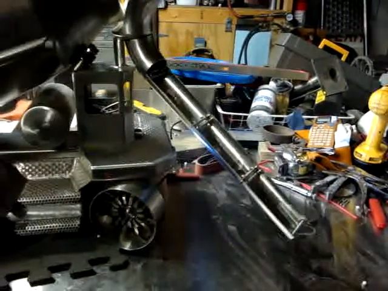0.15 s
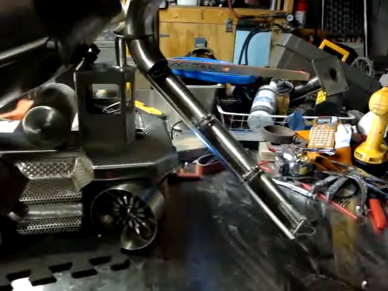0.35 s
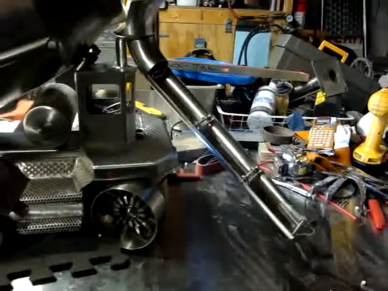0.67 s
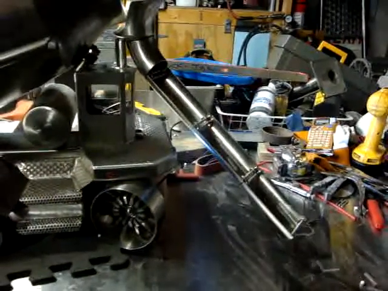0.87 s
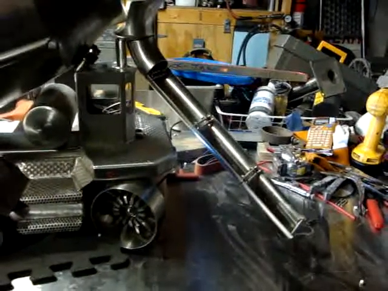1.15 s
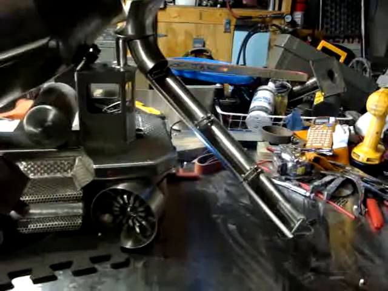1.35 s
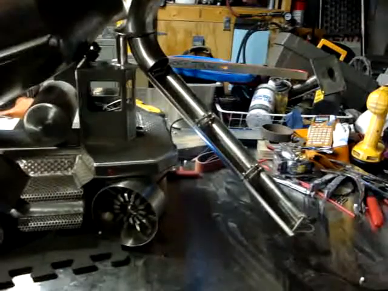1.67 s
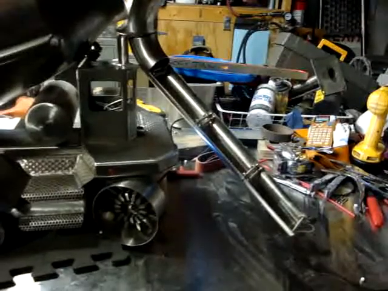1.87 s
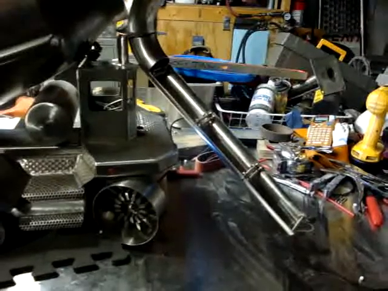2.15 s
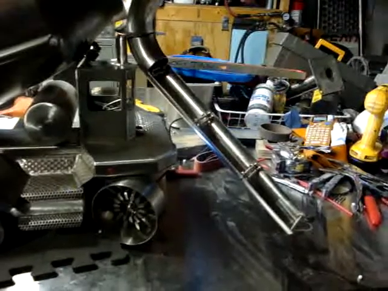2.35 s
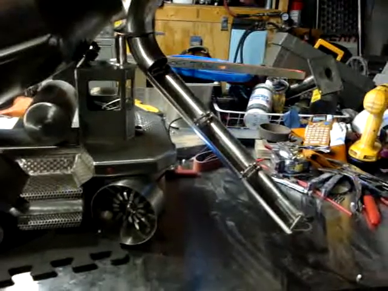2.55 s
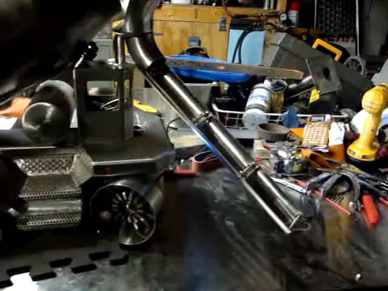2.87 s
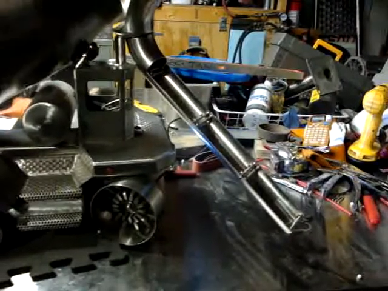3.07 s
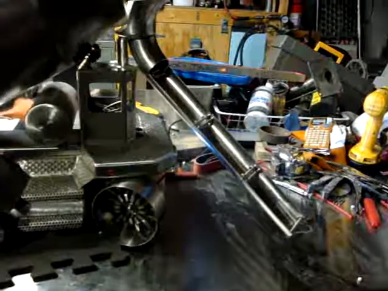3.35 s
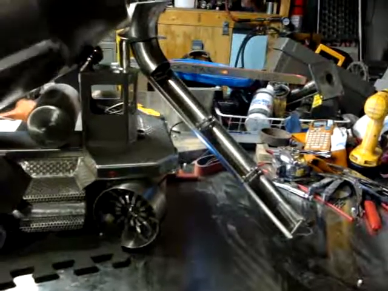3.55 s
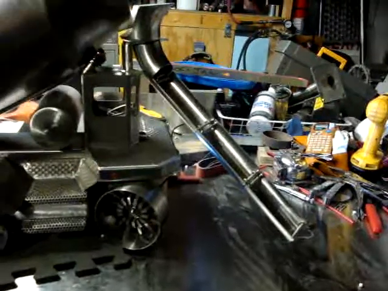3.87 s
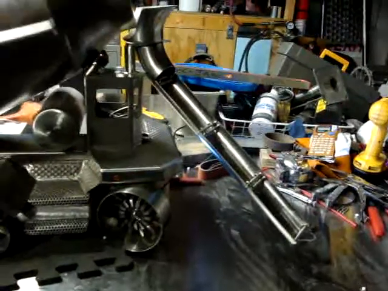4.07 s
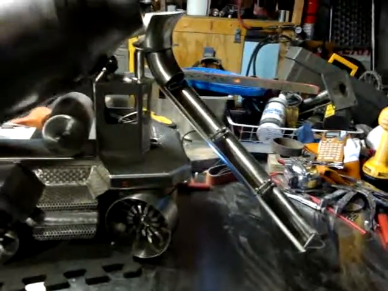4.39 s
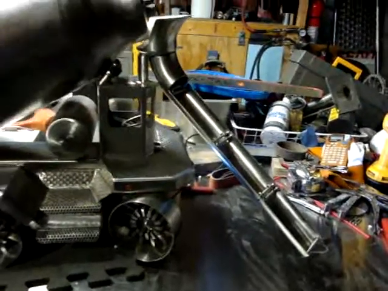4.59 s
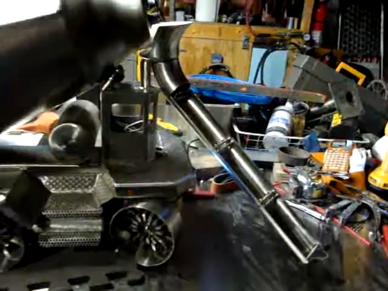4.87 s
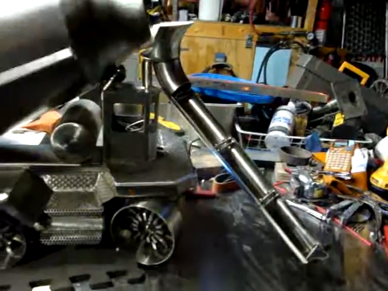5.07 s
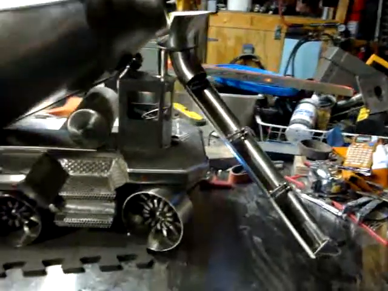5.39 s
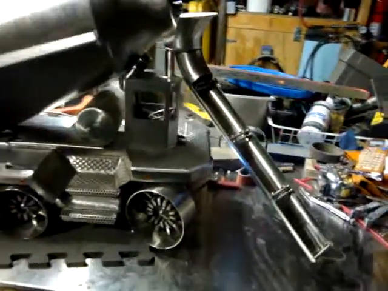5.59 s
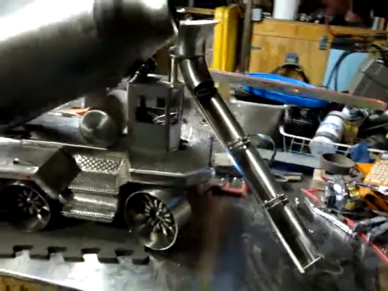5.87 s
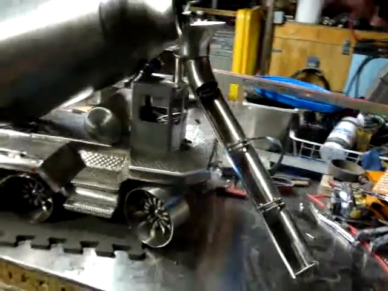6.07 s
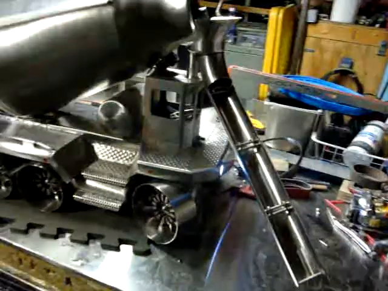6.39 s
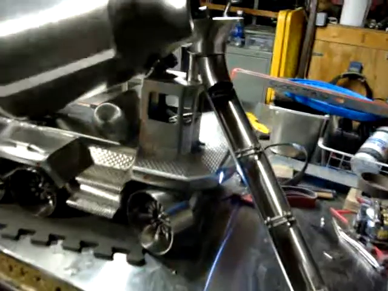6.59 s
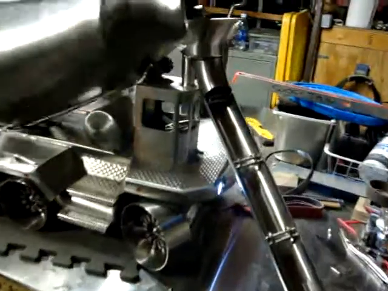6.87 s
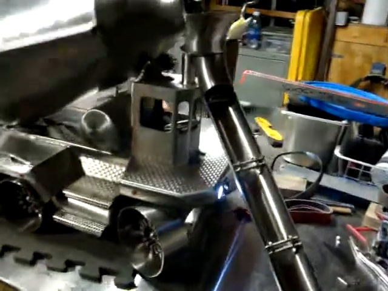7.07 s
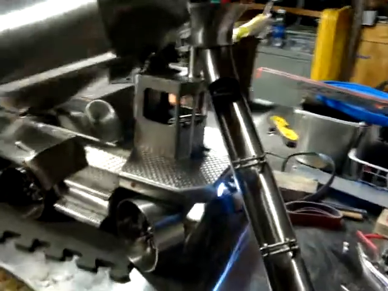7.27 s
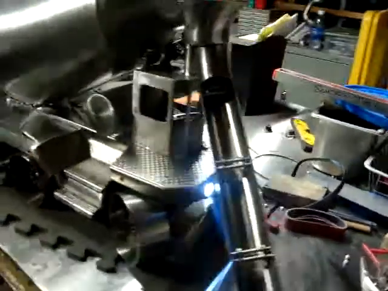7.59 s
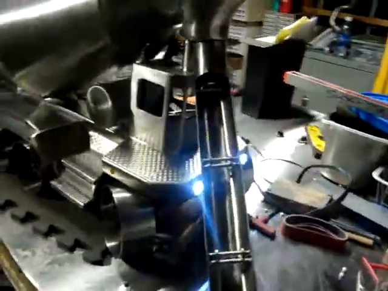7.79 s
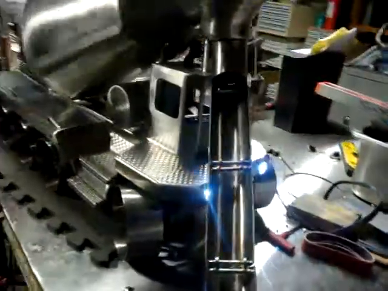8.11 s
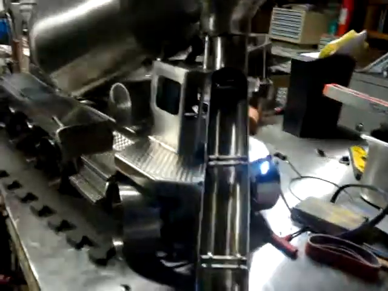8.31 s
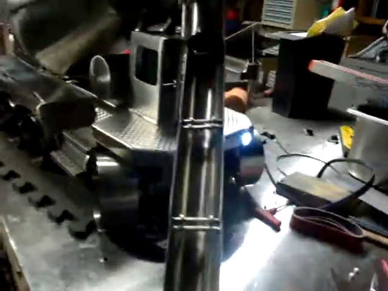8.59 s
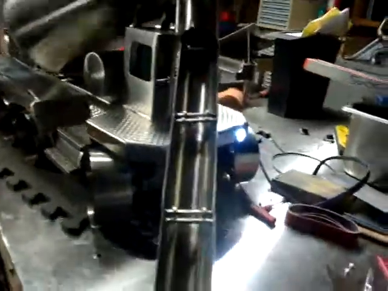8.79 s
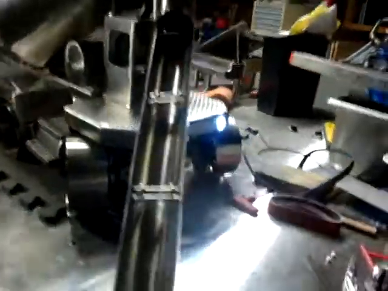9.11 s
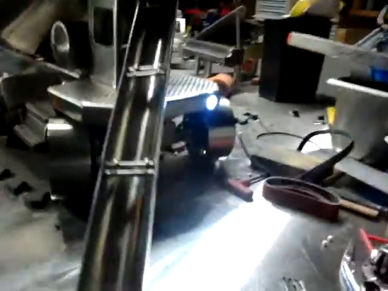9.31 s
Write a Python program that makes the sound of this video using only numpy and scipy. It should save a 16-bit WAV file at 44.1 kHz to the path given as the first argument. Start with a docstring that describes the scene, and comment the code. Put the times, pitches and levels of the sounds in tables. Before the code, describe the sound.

Light metallic rattling and short bright scrapes come first, with a few sharp clicks over faint shop air. A small electric motor then kicks in, climbing quickly to a reedy, ringing gear whine. Each drum turn drags the pitch slowly down with gritty grinding, then releases it quickly upward into hissing. Close microphone, mono, short reverberation of a cluttered shop.

```python
"""Workshop bench: a steel model mixer truck, close to a mono microphone, in faint shop air and hum.
Metal parts scrape and click: coloured noise grains and bursts, with sines for singing and ringing steel.
Then a small geared motor starts and turns the drum: gear-tone sines and noise bursts timed by the teeth.
The drum drags the motor down once a turn: the gears grind under load, and it hisses when running free."""
import sys
import numpy as np
from scipy import signal
from scipy.fft import rfft, irfft, next_fast_len
from scipy.io import wavfile
from scipy.ndimage import uniform_filter1d, map_coordinates

SR = 44100
rng = np.random.default_rng(int(sys.argv[2]) if len(sys.argv) > 2 else 0)


def digitize_waveform(pressure):
    """Quantize a signal to 16-bit integers and store it at the path in sys.argv[1].

    Rows of a 2-D input are taken as channels; values are limited to [-1, 1].
    """
    field = np.atleast_2d(pressure).T
    bounded = np.clip(field, -1, 1)
    quanta = np.round(bounded * 32767).astype(np.int16)
    wavfile.write(sys.argv[1], SR, quanta)


N = 416744
TIME = np.arange(N) / SR  # [s]
EDGE_HZ = 10150  # upper band limit

# Motor start, as tooth rate of the first gear; START_SHARE is the speed share missing at switch-on
START_S, SPIN_UP_S, START_SHARE, FREE_HZ = 2.62, 0.62, 0.522, 639.6
# Drum's heavy side lifted each turn: (time [s], time to the top [s], speed lost [Hz])
DRUM_LIFTS = [(3.165, 0.97, 125.1), (4.828, 0.83, 124.9), (6.318, 0.85, 120.9), (7.755, 0.98, 91.87),
              (9.294, 1, 118)]
# Past the top the load falls away; the curves are exponents
TIP_S, LIFT_CURVE, TIP_CURVE = 0.543, 1.245, 1.802
# Gears bind: (time [s], half length [s], speed lost [Hz], extra grinding [dB], extra hiss [dB])
GEAR_SNAGS = [(3.562, .07, 8.5, 3, 2), (3.688, 0.023, 1, 6.5, 1), (3.938, 0.1, 17.5, 0.5, 3),
              (4.271, 0.076, 7.5, 1, 3.5), (5.244, 0.051, 0, 3.5, 3.5), (5.563, .083, 25, 1, 0),
              (5.875, 0.048, 4, 0.5, 2.5), (7.117, 0.052, 26, 0.5, -3), (7.27, 0.15, 19.5, 2.5, 5.5),
              (8.316, 0.16, 29, 0, 0.5), (8.664, 0.12, 62, 7.5, -9), (8.846, 0.19, 49.5, 1, 2)]
# Base levels (running free [dB], at the top of the lift [dB])
GRIND_DB, RUMBLE_DB, CHATTER_DB = (-40.5, -35), (-50.5, -45.5), (-27.5, -27.5)
RUMBLE_FADE_DB_PER_S = 0.6  # the microphone moves round the truck
HISS_AT_FREE_DB, HISS_DB_PER_OCTAVE, HISS_TIPPING_DB = -31, 27, 1.5
SUPPLY_HZ, SUPPLY_DB = 116, -69  # low hum while the motor draws current

# Gear tones: (multiple of the tooth rate [-], relative level [dB])
GEAR_ORDERS = [(.4, -24.5), (.537, -20), (.6, -23), (1.2, -4), (1.8, -12), (2, -3.5), (2.4, -9), (3, 0),
               (3.6, -6.5), (4, -1), (4.2, -11.5), (4.8, -9), (5, -0.5), (5.4, -15.5), (6, -1.5),
               (6.6, -10.5), (7, 0), (7.2, -6), (8, -0.5), (9, 2.5), (10, 0.5), (11, -2)]
# Gear-tone level against pitch; the drum rings near 2.6 kHz: (frequency [Hz], level [dB])
WHINE_RESPONSE = [(220, -37), (280, -46), (312, -28.5), (345, -41), (560, -49.5), (660, -49), (750, -40),
                  (950, -41), (1130, -37.5), (1300, -43.5), (1900, -38), (2350, -37), (2500, -30.5),
                  (2620, -26.5), (2800, -34.5), (3050, -32), (3300, -31.5), (3700, -33.5), (4000, -36.5),
                  (4500, -39), (5100, -45.5), (6500, -51)]
# One gear tone rings out or sinks: (time [s], half length [s], multiple of tooth rate [-], extra [dB])
TONE_FLARES = [(2.82, 0.071, 1, 4), (2.832, 0.067, 6, 7), (2.824, 0.061, 7, 6.5), (2.986, 0.096, 5, 6),
               (3.27, .06, 5, -19), (3.25, 0.092, 6, -12), (3.295, 0.15, 1.2, 4), (3.423, 0.081, 4, 11.5),
               (3.43, .08, 6, 2), (3.48, 0.074, 5, 9), (4.05, 0.52, 1, 4), (4.114, .06, 5, 5),
               (4.24, 0.06, 5, -6.5), (4.378, 0.038, 7, 8), (4.486, 0.21, 5, 5.5), (4.45, 0.19, 6, 0),
               (4.63, 0.054, 4, -4), (4.8, 0.2, 1.2, 6.5), (4.95, 0.052, 4, 8.5), (4.984, 0.051, 5, 9),
               (5.206, 0.11, 6, 9), (5.42, 0.044, 6, -5), (5.48, 0.63, 7, 3.5), (5.6, 0.18, 1, 3),
               (5.607, 0.42, 8, 6.5), (5.856, 0.08, 6, 8.5), (6.01, 0.17, 5, 8.5), (6.317, 0.18, 4, 11),
               (6.578, 0.13, 5, 12), (6.683, .06, 7, 2), (6.727, 0.38, 6, 11), (6.833, .06, 8, 8),
               (7.09, 0.099, 8, 10.5), (7.12, 0.42, 7, 6.5), (7.172, 0.084, 5, 10), (7.286, 0.21, 6, 8),
               (7.58, 0.14, 5, 10), (7.755, 0.11, 7, 9), (7.971, 0.16, 1, 4.5), (8.122, 0.33, 6, 5.5),
               (8.33, 0.21, 7, 8.5), (8.477, 0.045, 6, 4), (8.604, 0.17, 5, -3), (8.696, 0.17, 8, 11),
               (8.957, 0.15, 5, 2.5), (9.3, 0.066, 6, 6), (9.297, 0.065, 7, 10.5), (9.304, 0.31, 1, 7)]
# Narrow drum modes: (frequency [Hz], width [Hz], relative level [dB])
DRUM_MODES = [(2516, 32, -3), (2596, 36, -0.5), (2655, 38, -4), (2820, 30, -7.5), (2970, 35, -12.5),
              (3260, 35, -3), (3410, 25, -5), (3550, 50, 0), (3620, 42, -2), (3970, 36, -1), (4114, 10, -4)]
# First gear's note; the chassis booms at some speeds: (tooth rate [Hz], level [dB])
CHASSIS_RESPONSE = [(430, -58), (495, -42.5), (515, -47.5), (545, -44.5), (568, -53), (595, -44.5),
                    (618, -39), (630, -43.5), (642, -49.5)]
# Steel body resonances: (frequency [Hz], width [Hz], lift [dB])
BODY_MODES = [(233, 56, 8), (303.7, 6.1, 8), (484, 19, 9.5), (787, 20, 4.5), (893, 50, 3.5),
              (1048, 22, 6.5), (1144, 15, -1.5), (1540, 160, 0.5), (1590, 70, 2), (1692, 32, 16.5),
              (1884, 72, 10), (2112, 90, 10.5), (2560, 310, 9), (2940, 200, 4), (3220, 45, 8),
              (3670, 1000, 8.5)]
# Grinding spectrum: (frequency [Hz], density [dB per Hz])
GRIND_SPECTRUM = [(30, -79), (200, -30), (400, -33), (520, -6), (650, 4.5), (800, 0), (1030, 0.5),
                  (1350, -2.5), (2000, -34), (3000, -28), (6000, -34)]
# Low gear rumble spectrum: (frequency [Hz], relative level [dB])
RUMBLE_SPECTRUM = [(30, -34.5), (55, -25), (90, -17), (120, -1.5), (165, -6), (215, 4.5), (300, 4),
                   (450, 8), (700, -1), (1500, -27)]
# Tooth chatter spectrum: (frequency [Hz], relative level [dB])
CHATTER_SPECTRUM = [(300, -40), (1300, -14.5), (1800, -7), (2350, -6.5), (2700, -4), (3700, -6.5),
                    (4400, -7), (5500, -6.5), (10000, -8.5)]
# Brush hiss spectrum: (frequency [Hz], relative level [dB])
HISS_SPECTRUM = [(1000, -21.5), (3000, -38.5), (5000, 1), (6300, -0.5), (7700, 12), (8800, 4.5),
                 (10000, -0.5)]
# Short spits of hiss: (time [s], half length [s], extra [dB])
HISS_SPITS = [(3.887, 0.0086, 12.5), (4.564, 0.037, 5.5), (5.77, .016, 8.5), (6.427, 0.061, 1),
              (7.66, 0.12, 2), (8.02, 0.12, 2.5), (8.867, .018, 10.5), (9.158, 0.052, 5.5)]

# Short strokes of steel sliding on steel: (time [s], hold [s], relative level [dB])
SLIDE_STROKES = [(0.0, 0.013, -31.5), (0.037, .01, -35), (0.049, 0.065, -29.5), (0.228, 0.13, -32.5),
                 (0.366, 0.041, -29), (0.545, 0.034, -34), (0.665, 0.037, -45.5)]
# Sliding contact spectrum: (frequency [Hz], density [dB per Hz])
SLIDE_SPECTRUM = [(100, -36), (400, -30), (750, -9), (1500, -7), (2600, 0.5), (4200, 5), (6000, 3),
                  (8000, 5.5), (10000, 9.5)]
# The sliding part sings: (time [s], hold [s], level [dB])
SLIDE_SINGS = [(0.0, 0.045, -41), (0.055, 0.022, -39), (0.2, 0.088, -40), (0.375, 0.081, -35.5),
               (0.5, 0.15, -43), (0.68, 0.078, -43), (1.11, .06, -55), (1.24, 0.063, -50)]
# Tones of the singing part: (frequency [Hz], relative level [dB])
SING_PARTIALS = [(3322, -2), (4005, -11), (4570, -16), (5825, -21), (6401, -32), (7467, -32)]
# Lower squeaks: (time [s], hold [s], level [dB], pitch [Hz])
SLIDE_SQUEAKS = [(0.09, 0.29, -47, 1740), (1.408, 0.077, -44, 2000)]
# An edge rasps over the steel after some clicks: (time [s], hold [s], level [dB])
EDGE_RASPS = [(0.972, .008, -32), (1.174, .004, -35.5), (1.405, 0.012, -29.5)]
# Rasp spectrum: (frequency [Hz], density [dB per Hz])
RASP_SPECTRUM = [(300, -55), (1000, -20), (1350, -11), (1750, -7.5), (2020, -1.5), (2400, -8), (3300, -6.5),
                 (5000, -12.5), (10000, -35)]

# Clicks of metal parts: (time [s], relative level [dB], brightness as centre frequency [Hz], chatter t60 [s],
# relative ring [dB], peak of the snap of first contact [dB])
METAL_CLICKS = [(0.051, -14.5, 8100, 0.057, -39, -24), (0.068, -15.5, 5030, 0.04, -42, -23),
                (0.091, -16, 8000, 0.03, -47, -26), (0.118, -21, 7000, .04, -45, -22),
                (0.162, -15.5, 6400, 0.046, -38, -26), (0.19, -18, 4200, 0.012, -48, -11),
                (0.193, -17, 3900, 0.02, -48, -21), (0.224, -14, 7550, 0.053, -40, -18),
                (0.267, -14, 4200, 0.12, -39, -25), (0.388, -27, 6500, 0.04, -38, -24),
                (0.413, -17, 6000, 0.04, -38, -24), (0.477, -19.5, 4200, 0.074, -25, -22),
                (0.549, -25, 7500, 0.03, -45, -18), (0.584, -23, 3320, 0.074, -37, -19),
                (0.668, -20.5, 3320, 0.052, -42, -16), (0.751, -22.5, 3660, 0.036, -46, -18),
                (0.779, -21.5, 3380, 0.071, -42, -19), (0.830, -20, 4320, 0.088, -46, -20),
                (0.883, -24, 5400, 0.21, -25, -26), (0.959, -35, 4500, 0.06, -50, -34),
                (0.973, -23.5, 2380, 0.084, -53, -16), (0.98, -23, 4500, .03, -50, -23),
                (1.014, -30, 1970, 0.09, -48, -28), (1.083, -24, 2750, 0.053, -25, -20),
                (1.164, -25, 3460, 0.06, -47, -16), (1.173, -18.5, 3840, 0.046, -36, -12),
                (1.219, -29, 3960, 0.18, -37, -18), (1.297, -24, 4140, 0.058, -47, -32),
                (1.338, -10.5, 3180, 0.021, -32, -12), (1.38, -25, 4400, 0.05, -48, -24),
                (1.406, -18, 3300, 0.091, -55, -11), (1.446, -26, 3400, 0.042, -57, -25),
                (1.557, -15.5, 3740, 0.04, -58, -17), (1.637, -15.5, 3870, 0.016, -32, -9),
                (1.641, -21, 3900, .02, -45, -8), (1.831, -24.5, 3760, 0.4, -35, -45),
                (1.866, -22, 1490, 0.052, -21.5, -23), (2.216, -34, 2500, 0.34, -48, -50),
                (2.347, -12.5, 5530, 0.076, -47, -35), (2.356, -13.5, 3150, 0.22, -39, -13),
                (2.544, -21.5, 2530, 0.39, -37, -28), (2.631, -20.5, 2400, 0.13, -37, -53)]
# Click spectrum: (frequency [Hz], density [dB per Hz])
CLICK_SPECTRUM = [(60, -54), (300, -22), (650, -7.5), (1200, -2.5), (2000, 2), (3800, 5.5), (5500, 1.5),
                  (8000, 2), (10000, -3)]
# Ringing steel parts: (frequency [Hz], relative level [dB], t60 [s])
STEEL_MODES = [(725, 3.5, 0.082), (1310, -7, 0.31), (2070, -14, 0.33), (2880, -13, 0.19), (3290, -12, 0.8),
               (4600, -5, 0.54), (5100, -9, .3), (5640, -4, 0.24), (6580, -8, 0.53), (8170, -6, 0.6),
               (9044, -15, 0.89), (9500, -13.5, 1)]
# Soft low bumps: (time [s], peak [dB])
LOW_BUMPS = [(0.229, -47), (0.429, -42), (0.514, -38), (0.55, -46), (0.751, -40), (0.884, -37),
             (1.082, -41), (1.359, -48), (3.879, -39), (8.099, -29)]

# Shop reverberation: (frequency [Hz], t60 [s])
ROOM_DECAY = [(150, 0.14), (700, 0.31), (2000, 0.31), (5000, 0.19), (10000, 0.023)]
# Shop air spectrum: (frequency [Hz], relative level [dB])
AIR_SPECTRUM = [(30, -34.5), (70, -21), (120, -11), (170, -8), (250, -4.5), (340, -5.5), (450, -2),
                (650, 2.5), (1000, 2.5), (2000, -3), (5000, -8.5), (10000, -17.5)]
AIR_RMS_DB = -55.5
# Faint steady shop hum: (frequency [Hz], level [dB])
SHOP_HUMS = [(120, -80.5), (352, -72.5)]


def motor(waver=0.0025, loaded_waver=0.004, start_load=0.84, start_whine_db=-12, start_hum_db=-18,
          start_chatter_db=-12, start_rumble_db=-17, attack_s=0.02, surge_db=1.0):
    """Drum load sets shaft speed; both drive whine, hum, grinding, tooth chatter and brush hiss."""
    load, tipping, lost_hz = drum()
    snag_hz, snag_grind_db, snag_hiss_db = snags()
    starting = np.clip(1 - (TIME - START_S) / SPIN_UP_S, 0, 1) ** 2
    unsteadiness = 1 + (waver + loaded_waver * (load + starting)) * wander(35)
    tooth_hz = (FREE_HZ - lost_hz - snag_hz) * (1 - START_SHARE * starting) * unsteadiness
    teeth = np.cumsum(tooth_hz) / SR
    strain = load + start_load * np.sqrt(starting)  # getting the drum moving is work too
    binding = amp(snag_grind_db + surge_db * wander(12))

    grind = rattle(teeth / 5, GRIND_SPECTRUM, spread_db=2.0, sharp=0.9, lump_db=0.27, lump_hz=44.6)
    grind *= between(*GRIND_DB, strain) * binding

    rumble = rattle(teeth / 10, RUMBLE_SPECTRUM, spread_db=0.5, sharp=0.86, lump_db=1.5, lump_hz=20)
    rumble_trim_db = start_rumble_db * starting - RUMBLE_FADE_DB_PER_S * (TIME - START_S)
    rumble *= between(*RUMBLE_DB, strain) * binding * amp(rumble_trim_db)

    chatter = rattle(teeth, CHATTER_SPECTRUM, spread_db=4.0, sharp=1.0, lump_db=1.4, lump_hz=30.16)
    chatter = shimmer(chatter, depth_db=2, patch_hz=140.8, patch_s=0.09)
    chatter *= between(*CHATTER_DB, load) * amp(start_chatter_db * starting)

    hiss = rattle(teeth, HISS_SPECTRUM, spread_db=0.5, sharp=1.5, lump_db=0.9, lump_hz=60.8)
    hiss = shimmer(hiss, depth_db=2.5, patch_hz=110.3, patch_s=0.2)
    hiss_db = HISS_AT_FREE_DB + HISS_DB_PER_OCTAVE * np.log2(tooth_hz / FREE_HZ)
    hiss_db = hiss_db + HISS_TIPPING_DB * tipping + snag_hiss_db
    hiss_db = hiss_db + sum(db * bell(s, half_s) for s, half_s, db in HISS_SPITS)
    hiss *= amp(hiss_db)

    supply = amp(SUPPLY_DB + 3 * wander(20)) * np.sin(2 * np.pi * SUPPLY_HZ * TIME + 2 * wander(27))
    tones = amp(start_whine_db * starting) * whine(tooth_hz, teeth, strain)
    tones += amp(start_hum_db * starting ** 2) * hum(tooth_hz, teeth)
    switched_on = np.clip((TIME - START_S) / attack_s, 0, 1)
    return switched_on * (tones + grind + rumble + chatter + hiss + supply)


def drum():
    """Load (0-1), tipping over the top (0-1), speed lost [Hz]: slow lift, quick release each turn."""
    load, tipping, lost_hz = np.zeros((3, N))
    for s, lift_s, sag_hz in DRUM_LIFTS:
        up = np.clip((TIME - s) / lift_s, 0, 1)
        over = np.clip((TIME - s - lift_s) / TIP_S, 0, 1)
        weight = np.sin(np.pi / 2 * up) ** LIFT_CURVE * np.cos(np.pi / 2 * over ** TIP_CURVE) ** 2
        load += weight
        tipping += np.sin(np.pi * over)
        lost_hz += sag_hz * weight
    return load, tipping, lost_hz


def snags():
    """Speed lost [Hz], extra grinding [dB] and extra hiss [dB] while the gears bind."""
    return sum(np.outer(effects, bell(s, half_s)) for s, half_s, *effects in GEAR_SNAGS)


def whine(tooth_hz, teeth, load, flutter_db=2.5, flutter_hz=55, fade_db=1.2, fade_hz=14,
          slip_rad=0.03, bound_slip_rad=0.055, free_db=-0.27, loaded_db=0.5):
    """Gear tones sweep through drum and body resonances, fluttering with the uneven teeth."""
    # the teeth slip more while the gears bind
    play_rad = (slip_rad + bound_slip_rad * amp(snags()[1])) * wander(90)
    tones = np.zeros(N)
    for k, db in GEAR_ORDERS:
        # uneven teeth, shifting reflections
        loose_db = flutter_db * wander(flutter_hz) + fade_db * wander(fade_hz)
        level_db = db + read(WHINE_RESPONSE, k * tooth_hz) + flare(k) + loose_db
        backlash_rad = 0.02 * k * wander(70)
        phase_rad = k * (2 * np.pi * teeth + play_rad) + backlash_rad + 2 * np.pi * rng.random()
        tones += amp(level_db) * np.sin(phase_rad)
    return between(free_db, loaded_db, load) * room(drum_ring(tones), wet_db=-9.5)


def flare(multiple):
    """Extra level [dB] over time for one gear tone."""
    return sum(db * bell(s, half_s) for s, half_s, k, db in TONE_FLARES if abs(k - multiple) < 0.15)


def drum_ring(x, direct_db=-1.5):
    """The drum's narrow modes catch each passing tone and ring on after it."""
    size = next_fast_len(N + 8192)
    hz = np.fft.rfftfreq(size, 1 / SR)
    modes = sum(amp(db) / (1 + 2j * (hz - f) / width) for f, width, db in DRUM_MODES)
    return irfft(rfft(x, size) * amp(direct_db) * (1 + modes), size)[:N]


def hum(tooth_hz, teeth, flutter_db=2, fade_db=2.0):
    """The first gear's own note, swelling and sinking as it passes the chassis resonances."""
    note = amp(flutter_db * wander(40)) * np.sin(2 * np.pi * teeth)
    note = steady(room(note, wet_db=-10.0))
    return amp(read(CHASSIS_RESPONSE, tooth_hz) + flare(1) + fade_db * wander(9)) * note


def rattle(contacts, spectrum, spread_db, sharp, lump_db, lump_hz):
    """Every contact lands with its own force and sends a short noise burst into the body; rms 1."""
    force = amp(spread_db * rng.standard_normal(N))[contacts.astype(int)]
    decay = np.exp(-sharp * (contacts % 1))
    bursts = force * decay * amp(lump_db * wander(lump_hz)) * rng.standard_normal(N)
    bursts = colour(bursts, lambda hz: read(spectrum, hz) + body_db(hz))
    return unit(room(bursts, wet_db=-4.5))


def body_db(hz):
    """How much the steel body lifts each frequency [dB]."""
    return sum(db / (1 + (2 * (hz - f) / width) ** 2) for f, width, db in BODY_MODES)


def slide(grain_db=6, grain_hz=420, clump_db=2, clump_hz=90, snag_db=-8, snags_per_s=150,
          beat=0.25, drift_rad=0.95):
    """Steel catches on steel in small grains and sharp snags, and the rubbed part sings."""
    scrape = np.zeros(N)
    for contact_hz in (1500, 3030, 4180, 5870, 7000, 9200):  # each contact has its own colour
        grains = rng.standard_normal(N) * amp(grain_db * wander(grain_hz) + clump_db * wander(clump_hz))
        band_db = lambda hz: -10 * np.log10(1 + ((hz - contact_hz) / 900) ** 4)
        scrape += colour(grains, lambda hz: read(SLIDE_SPECTRUM, hz) + band_db(hz))

    catches = rng.random(N) * (rng.random(N) < snags_per_s / SR)
    # each tick decays over 60 samples
    ticks = signal.lfilter([1], [1, -np.exp(-1 / 60)], catches) * rng.standard_normal(N)
    ticks = colour(ticks, lambda hz: read(SLIDE_SPECTRUM, hz))
    scrape = room(unit(scrape) + amp(snag_db) * unit(ticks), wet_db=-4.5)
    scrape = shimmer(scrape, depth_db=3.0, patch_hz=168.7, patch_s=0.0486)

    def tone(hz):
        """Sine with wavering level and phase."""
        return (1 + beat * wander(25.1)) * np.sin(2 * np.pi * hz * TIME + drift_rad * wander(21.0))

    song = unit(sum(amp(db) * tone(hz) for hz, db in SING_PARTIALS))
    mix = amp(-2.5) * swells(SLIDE_STROKES, attack_s=0.0013, fall_db_per_s=117) * scrape
    mix += swells(SLIDE_SINGS, attack_s=0.02, fall_db_per_s=142) * song
    for *row, hz in SLIDE_SQUEAKS:
        mix += swells([row], attack_s=0.021, fall_db_per_s=300) * tone(hz)
    return mix


def rasp(grain_db=3, grain_hz=300):
    """A steel edge drags briefly, with a dull, grainy ring."""
    grains = rng.standard_normal(N) * amp(grain_db * wander(grain_hz))
    grains = colour(grains, lambda hz: read(RASP_SPECTRUM, hz))
    return swells(EDGE_RASPS, attack_s=0.0022, fall_db_per_s=194) * unit(room(grains, wet_db=-15))


def clicks(tilt_db_per_octave=4, centre_hz=3500, crack_t60_s=0.02, chatter_db=-6, heavy_db=7,
           rise_s=0.0016, clank_db=12.0, clank_t60_s=0.37, own_db=4, own_width=0.043, snap_hz=6000):
    """A hard snap and crack, chatter as the part settles, and a ring of steel over a dense clank."""
    mix, t = np.zeros(N), np.arange(SR // 2) / SR

    def dying(t60_s):
        """Soft-onset exponential decay."""
        return np.exp(-np.log(1000) * t / max(t60_s, 1e-3)) * (1 - np.exp(-t / rise_s))

    lead = SR // 100  # samples, room for the filters' pre-ring
    snap_db_at = lambda hz: read(CLICK_SPECTRUM, hz) - 10 * np.log10(1 + (hz / snap_hz) ** 4)
    snap = colour(signal.unit_impulse(2 * lead, lead), snap_db_at)
    for s, db, bright_hz, t60_s, ring_db, snap_db in METAL_CLICKS:
        # hard contacts are bright; heavy, dull ones ring the whole body
        hardness = np.log2(bright_hz / centre_hz)
        ringing = amp(ring_db - heavy_db * hardness)
        envelope = dying(crack_t60_s) + amp(chatter_db) * dying(t60_s)
        envelope += ringing * amp(clank_db) * dying(clank_t60_s)
        burst = rng.standard_normal(len(t)) * envelope

        slope = lambda hz: tilt_db_per_octave * hardness * np.log2(np.clip(hz, 700, 10000) / centre_hz)
        # the struck part's own resonance
        own = lambda hz: own_db / (1 + ((hz / bright_hz - 1) / own_width) ** 2)
        burst_db_at = lambda hz: read(CLICK_SPECTRUM, hz) + slope(hz) + own(hz) - 60 * (hz > EDGE_HZ)
        burst = colour(np.pad(burst, (lead, 0)), burst_db_at)
        burst /= burst[lead:lead + SR // 200].std()  # level set by the first 5 ms

        ring = sum(amp(d) * dying(life_s) * np.sin(2 * np.pi * hz * t) for hz, d, life_s in STEEL_MODES)
        add(mix, s - lead / SR, 0.33 * amp(db) * burst)
        add(mix, s - lead / SR, amp(snap_db) * snap / snap.max())
        add(mix, s, amp(db) * ringing * ring)
    return amp(-2.0) * room(mix, wet_db=-9.5)


def bumps(rise_s=0.00018):
    """Brief low pushes: one-sided pulses that rise fast and decay."""
    mix, u = np.zeros(N), np.arange(SR // 20) / SR / rise_s
    for s, db in LOW_BUMPS:
        add(mix, s - rise_s, amp(db) * u * np.exp(1 - u))
    return mix


def shop_air():
    """Quiet coloured noise with faint, slightly wavering hum tones."""
    air = colour(rng.standard_normal(N), lambda hz: read(AIR_SPECTRUM, hz))
    air = amp(AIR_RMS_DB) * unit(air)
    for hz, db in SHOP_HUMS:
        air += amp(db + 2.7 * wander(9.8)) * np.sin(2 * np.pi * hz * TIME + wander(11))
    return air


def room(x, wet_db):
    """Direct sound plus dense reflections from the cluttered shop, each band dying at its own speed."""
    taps = rng.standard_normal(SR // 2) * (rng.random(SR // 2) < 0.1)
    taps[:SR // 400] = 0  # 2.5 ms before the first reflection
    hz, t, z = signal.stft(taps, SR, nperseg=256)
    decay_db = -60 * t / read(ROOM_DECAY, hz)[:, None]
    tail = signal.istft(z * amp(decay_db), SR, nperseg=256)[1]
    wet = signal.oaconvolve(x, tail / np.linalg.norm(tail))[:N]
    return (x + amp(wet_db) * wet) / np.sqrt(1 + amp(2 * wet_db))


def shimmer(x, depth_db, patch_hz, patch_s):
    """Narrow resonances come and go as the contact moves over the steel; rms 1."""
    hz, t, z = signal.stft(x, SR, nperseg=1024, noverlap=768)
    places = np.meshgrid(hz / patch_hz, t / patch_s, indexing="ij")
    field = map_coordinates(rng.standard_normal((400, 400)), places, order=1, mode="wrap")
    shimmered = signal.istft(z * amp(depth_db * unit(field)), SR, nperseg=1024, noverlap=768)[1]
    return unit(shimmered[:N])


def swells(rows, attack_s, fall_db_per_s):
    """Gain over time for rows of (time [s], hold [s], level [dB]): each rises, holds and dies away."""
    gain = np.zeros(N)
    for s, hold_s, db in rows:
        fall_db = fall_db_per_s * np.maximum(TIME - s - hold_s, 0)
        gain += np.clip((TIME - s) / attack_s, 0, 1) * amp(db - fall_db)
    return gain


def bell(s, half_s):
    """Gaussian bump of height 1, down to 1/e at half_s from its centre."""
    return np.exp(-((TIME - s) / half_s) ** 2)


def between(free_db, loaded_db, load):
    """Gain that moves from its free level to its loaded level."""
    return amp(free_db + (loaded_db - free_db) * load)


def wander(rate_hz):
    """Smooth chance of rms 1 that changes at about the given rate."""
    steps = uniform_filter1d(np.repeat(rng.standard_normal(4000), 4), size=4)
    return unit(np.interp(TIME * rate_hz * 4, np.arange(len(steps)), steps))


def steady(x):
    """Holds the rms near 1 over each tenth of a second, keeping the faster flutter."""
    power = np.abs(uniform_filter1d(x ** 2, size=4410))
    return x / np.sqrt(power + 1e-4 * power.mean())


def colour(x, db_at):
    """Filters x by a function from Hz to dB."""
    size = next_fast_len(len(x) + 2048)
    return irfft(rfft(x, size) * amp(db_at(np.fft.rfftfreq(size, 1 / SR))), size)[:len(x)]


def read(points, hz):
    """Reads a table's second column on a log-frequency axis."""
    f, value = np.transpose(points)
    return np.interp(np.log(hz + 1), np.log(f), value)


def add(mix, s, sound):
    """Mixes a sound in at a time [s]."""
    part = mix[max(round(s * SR), 0):][:len(sound)]
    part += sound[:len(part)]


def unit(x):
    """Scales to rms 1."""
    return x / np.sqrt(np.mean(x ** 2) + 1e-20)


def amp(db):
    """Decibels to gain."""
    return np.exp(np.asarray(db) * (np.log(10) / 20))


def scene():
    """All sources sum at one microphone; the same signal feeds both channels."""
    air = shop_air()
    mono = motor() + slide() + rasp() + clicks() + bumps() + air
    return np.array([mono, mono])


def record(dry):
    """Steep linear-phase low-pass at the band limit."""
    lowpass = signal.firwin(601, EDGE_HZ, window=("kaiser", 9), fs=SR)
    return signal.oaconvolve(dry, lowpass[None], "same")


dry = scene()
out = record(dry)
digitize_waveform(out)
```